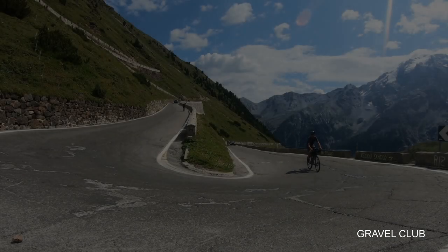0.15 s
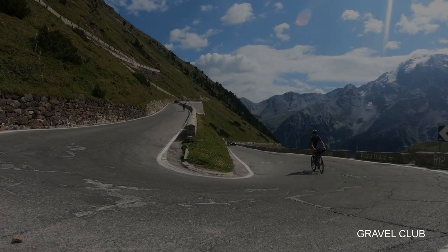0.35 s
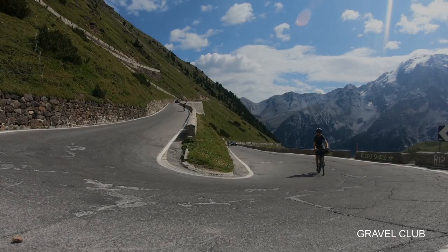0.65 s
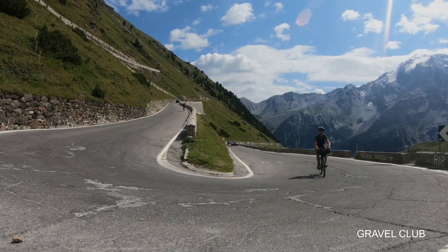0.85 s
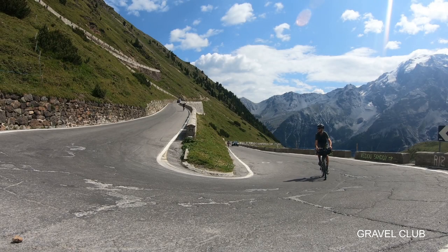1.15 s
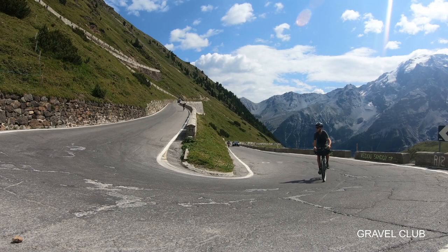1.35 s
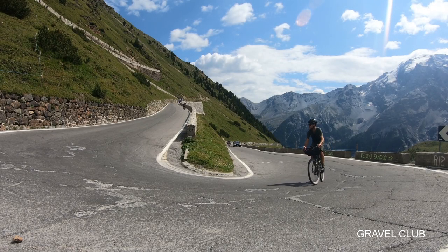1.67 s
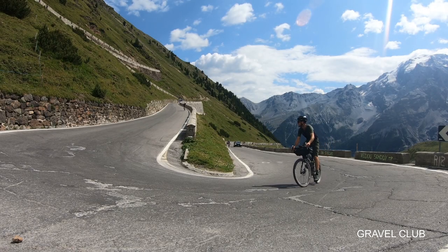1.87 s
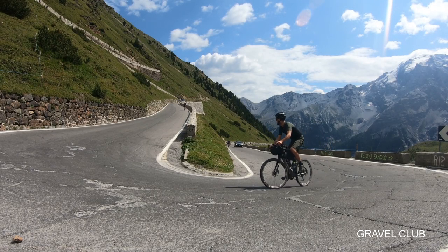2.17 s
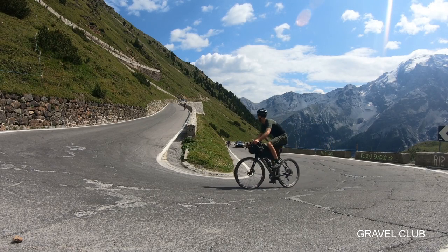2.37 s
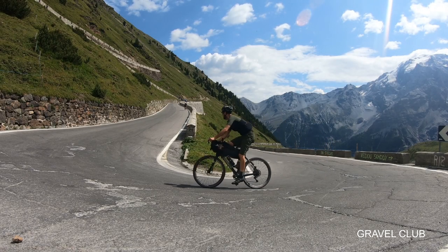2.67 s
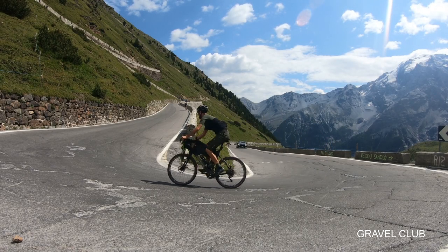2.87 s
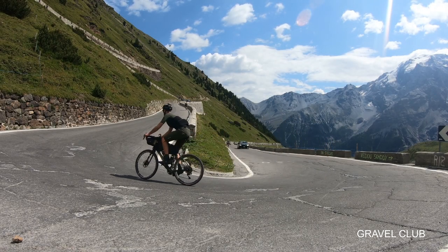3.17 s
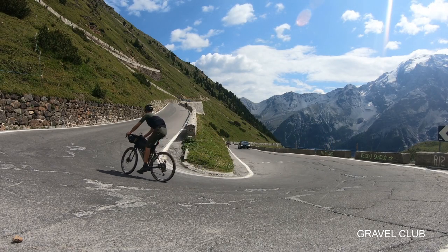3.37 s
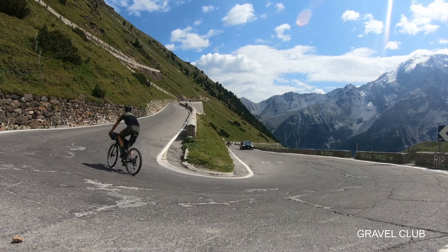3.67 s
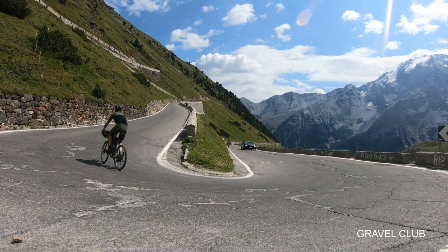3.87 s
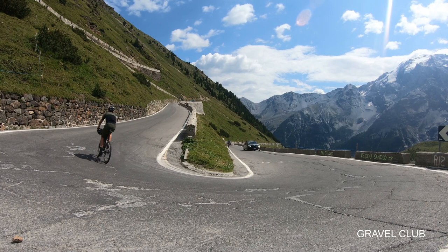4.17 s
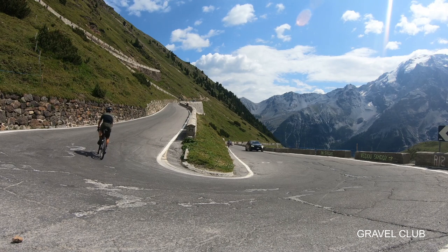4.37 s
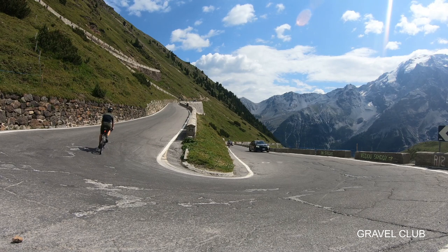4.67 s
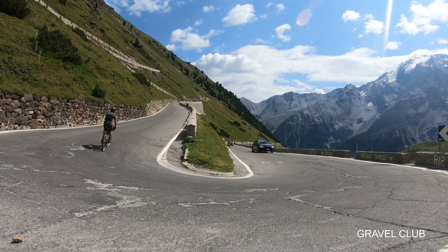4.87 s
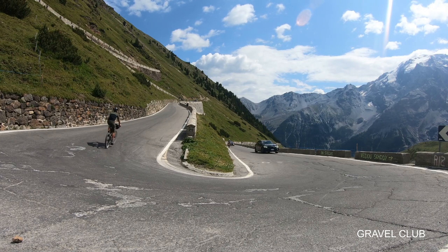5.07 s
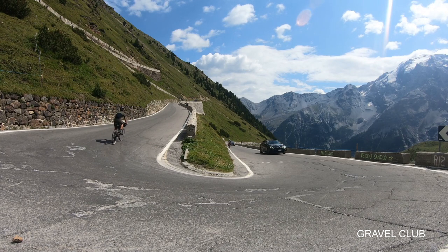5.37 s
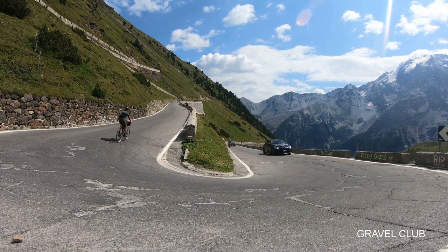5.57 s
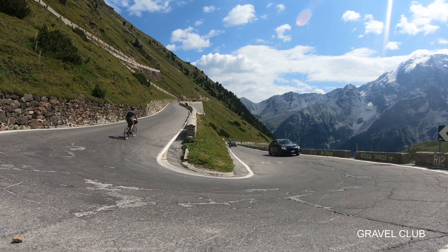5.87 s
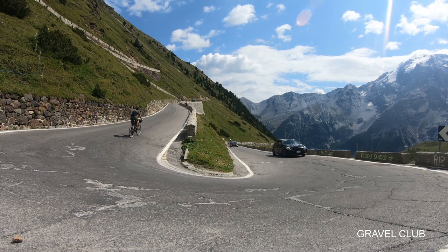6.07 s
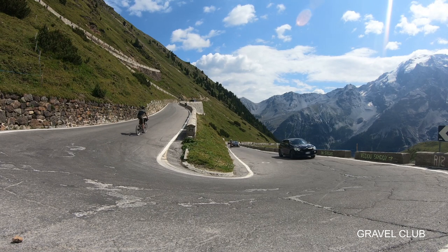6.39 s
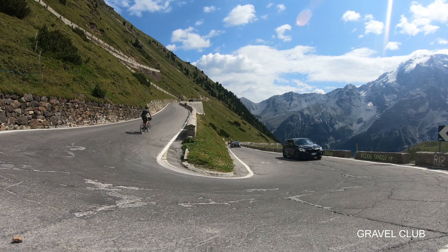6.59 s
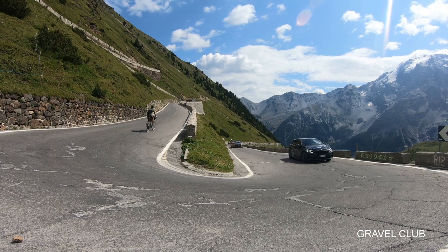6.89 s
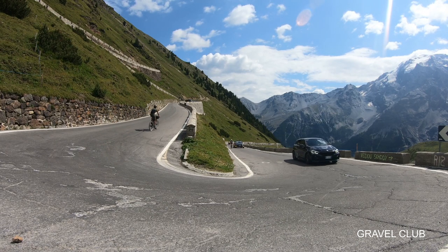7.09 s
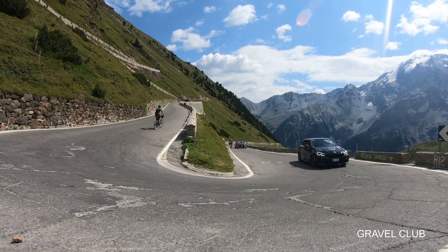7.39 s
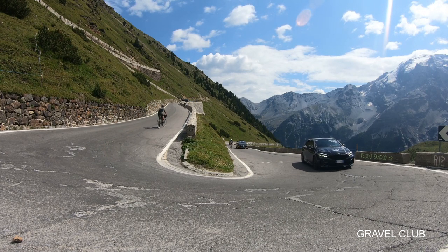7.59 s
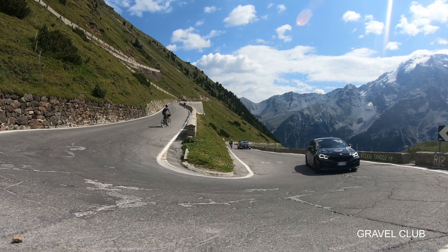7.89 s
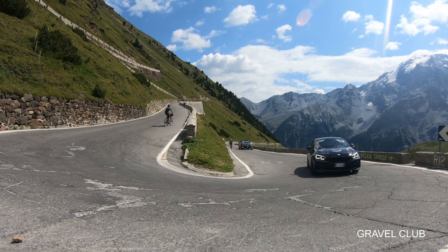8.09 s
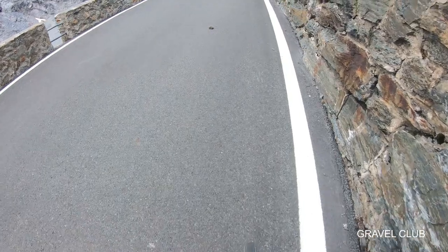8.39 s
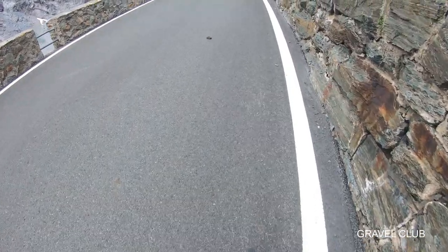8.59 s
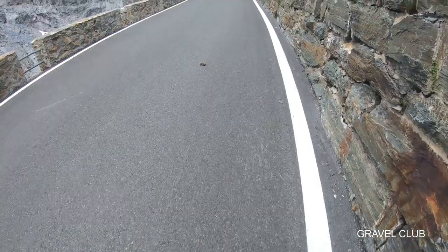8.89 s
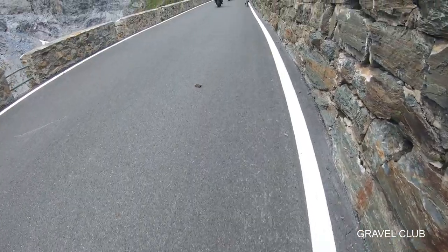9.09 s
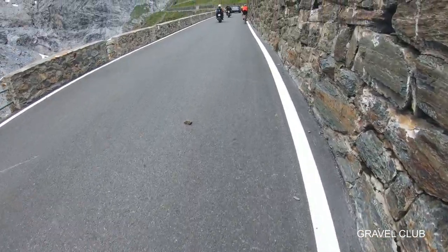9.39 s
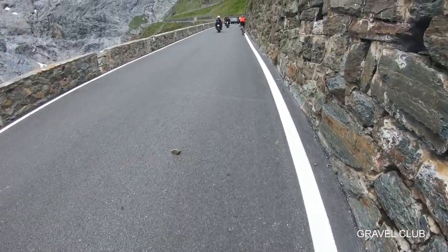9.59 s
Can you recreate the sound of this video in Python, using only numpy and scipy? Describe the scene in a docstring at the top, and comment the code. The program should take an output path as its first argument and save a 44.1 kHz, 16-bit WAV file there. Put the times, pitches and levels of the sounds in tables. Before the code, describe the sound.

Engines drone on a windy mountain road as a bicycle whirs past and a car approaches; then a motorcycle rumbles up close.

```python
"""A mountain pass, microphone at the roadside below a hairpin. Distant engines drone and beat against
each other over wind, rumble and tyre roar. One vehicle's hiss recedes, a bicycle ticks by, a faint
grasshopper rasps and a grit stone pops under an approaching car. After a short silence the microphone
is on board a twin-cylinder motorcycle pulling gently uphill, close to its exhaust, intake and gears."""
import sys
import numpy as np
from scipy import signal
from scipy.fft import rfft, irfft
from scipy.io import wavfile

SR = 44100
rng = np.random.default_rng(int(sys.argv[2]) if len(sys.argv) > 2 else 0)


def int16_out(signal):
    """Quantize to a 16-bit WAV file."""
    q = np.round(np.clip(np.atleast_2d(signal).T, -1, 1) * 32767)
    wavfile.write(sys.argv[1], SR, q.astype(np.int16))


N = 429534
T = np.arange(N) / SR
ROADSIDE_END_S, RIDE_START_S, RIDE_FULL_S = 8.243, 8.385, 8.47

# exhaust note from far across the slope: (multiple of the firing rate, level [dB])
FAR_NOTE = [(1, 0.5), (2, -18)]


def from_db(db):
    """Decibels to gain."""
    return 10 ** (np.asarray(db) / 20)


def rms_one(x):
    """Scale to rms 1."""
    return x / np.sqrt(np.mean(x ** 2) + 1e-20)


def in_time(rows):
    """Each column of a timed curve at every sample."""
    times, *columns = np.transpose(rows)
    return [np.interp(T, times, column) for column in columns]


def drift(rate_hz):
    """Smooth random wander of rms 1, mostly slower than rate_hz."""
    hz = np.arange(N // 2 + 1) * SR / N
    return rms_one(irfft(rfft(rng.standard_normal(N)) / (1 + (hz / rate_hz) ** 2), N))


def noise(colour):
    """Noise of rms 1 shaped by (frequency [Hz], level [dB]) points, falling steeply beyond them."""
    hz = np.maximum(np.arange(N // 2 + 1) * SR / N, 1)
    points_hz, db = np.transpose(colour)
    skirts = np.minimum(hz / points_hz[0], 1) ** 4 * np.minimum(points_hz[-1] / hz, 1) ** 8
    shape = from_db(np.interp(np.log(hz), np.log(points_hz), db))
    return rms_one(irfft(rfft(rng.standard_normal(N)) * skirts * shape, N))


def swell(db, from_s, rise_db_per_s, to_s=np.inf, fall_db_per_s=0):
    """Gain of a source that draws near, holds db between from_s and to_s, then recedes."""
    rise_db = rise_db_per_s * np.maximum(from_s - T, 0)
    fall_db = fall_db_per_s * np.maximum(T - to_s, 0)
    return from_db(db - rise_db - fall_db)


def revving(top_hz, from_s, rise_hz_per_s, to_s=np.inf, sag_hz_per_s=0):
    """Firing rate of an engine that picks up, holds and, if given an end, eases off."""
    return top_hz - rise_hz_per_s * np.maximum(from_s - T, 0) - sag_hz_per_s * np.maximum(T - to_s, 0)


def turning(hz):
    """Angle of something that turns hz times a second."""
    return 2 * np.pi * (np.cumsum(hz) / SR + rng.random())


def following(sound, speed):
    """Play a sound faster as its source turns faster; speed 1 keeps its pitch."""
    return np.interp(np.cumsum(speed) % N, np.arange(N), sound)


def harmonics(angle, note, flutter, flutter_hz):
    """Harmonics of an engine's rotation; uneven combustion makes each one flutter."""
    out = np.zeros(N)
    for multiple, db in note:
        wave = np.sin(round(multiple) * angle + rng.uniform(0, 2 * np.pi))
        out += np.sqrt(2) * from_db(db) * wave * (1 + flutter * drift(flutter_hz))
    return out


def distant_engine(hz, note, wander, flutter):
    """An engine heard across the slope, its pitch and strength unsteady."""
    angle = turning(hz * (1 + wander * drift(5.27)))
    return harmonics(angle, note, flutter, flutter_hz=6.6)


def lull(at_s=2.2, width_s=.42, depth_db=5):
    """Gain of the deepest bass, which sinks once and recovers."""
    return from_db(-depth_db * np.exp(-((T - at_s) / width_s) ** 2))


def bass_dips(edge_s=.024):
    """Gain of the bass, which drops away for a few brief moments."""
    # dips in level: (start [s], end [s], depth [dB])
    dips = [(-.1, 0.173, 12), (.173, .304, 1.5), (0.293, 0.572, 10.5), (6.307, 6.754, 3), (6.914, 7.1, 8.5),
            (7.935, 8.005, 7.5)]
    dip_db = sum(db * .5 * (np.tanh((T - start) / edge_s) - np.tanh((T - end) / edge_s))
                 for start, end, db in dips)
    return from_db(-dip_db)


def hairpin_car():
    """A car slows for the hairpin, booms once on the way and pulls again in the bend."""
    # its approach: (time [s], firing rate [Hz], level [dB])
    approach = [(0, 110, -37.5), (.7, 109, -31), (2.1, 106.3, -33), (2.4, 105.5, -26.5), (3, 103.7, -26.5),
                (3.7, 99.5, -30), (4.85, 96, -30.5), (5.4, 95.3, -37), (6, 91.5, -34.5), (6.5, 88, -36),
                (6.95, 86.5, -43), (7.25, 85.7, -29.5), (8.24, 83, -31)]
    # its exhaust: (multiple of the firing rate, level [dB])
    note = [(1, -0.5), (2, -28.5), (3, -34.5)]
    hz, db = in_time(approach)
    return from_db(db) * distant_engine(hz, note, wander=.0018, flutter=.16)


def leaving_engine():
    """A vehicle hums briefly as it pulls away from the microphone."""
    # its exhaust: (multiple of the firing rate, level [dB])
    note = [(2, -2), (3, -2)]
    hz = revving(top_hz=85.2, from_s=.92, rise_hz_per_s=4)
    gain = swell(db=-40, from_s=.79, rise_db_per_s=24, to_s=.85, fall_db_per_s=25.5)
    return gain * distant_engine(hz, note, wander=.0036, flutter=.24)


def far_engine():
    """A far engine revs up, holds and sags while it slowly draws nearer."""
    hz = revving(top_hz=137.35, from_s=1.7, rise_hz_per_s=4.8, to_s=3.3, sag_hz_per_s=2.2)
    gain = swell(db=-35.5, from_s=8.05, rise_db_per_s=1.16)
    return gain * distant_engine(hz, FAR_NOTE, wander=.0036, flutter=.23)


def heavy_engine(start_hz=46.54, idle_hz=38.17, settle_s=3.1, firings_per_throb=16.4, throb_at_s=2.29):
    """A heavy engine settles towards idle and recedes; its overtones throb, slowing with it."""
    # exhaust overtones: (multiple of the firing rate, level [dB])
    note = [(2, 1.5), (3, -16.5), (4, -23), (6, -28)]
    hz = idle_hz + (start_hz - idle_hz) * np.exp(-T / settle_s)
    firings = np.cumsum(hz) / SR
    throbs = (firings - np.interp(throb_at_s, T, firings)) / firings_per_throb
    throb = 1 + .38 * np.cos(2 * np.pi * throbs)
    angle = turning(hz * (1 + .0022 * drift(5.14)))
    fundamental = np.sqrt(2) * from_db(-4) * lull() * np.sin(angle)
    overtones = throb * harmonics(angle, note, flutter=.11, flutter_hz=9.9)
    gain = swell(db=-31.5, from_s=.68, rise_db_per_s=13, to_s=5.3, fall_db_per_s=2.5)
    return gain * (fundamental + overtones)


def climbing_motorbike():
    """A motorbike on the slope; its second harmonic swells as it pulls, its third as it eases off."""
    # its exhaust: (multiple of the firing rate, level [dB])
    note = [(1, 0.5), (5, -33.5)]
    hz = revving(top_hz=116.5, from_s=1.7, rise_hz_per_s=4, to_s=2.15, sag_hz_per_s=3.1)
    angle = turning(hz * (1 + .0027 * drift(4.5)))
    gain = swell(db=-33, from_s=.63, rise_db_per_s=18, to_s=2.3, fall_db_per_s=6)
    second = swell(db=-39, from_s=1.2, rise_db_per_s=23, to_s=1.98, fall_db_per_s=9.5)
    third = swell(db=-48, from_s=2, rise_db_per_s=5, to_s=3.5, fall_db_per_s=13)
    body = gain * harmonics(angle, note, flutter=.063, flutter_hz=13)
    return body + np.sqrt(2) * (second * np.sin(2 * angle) + third * np.sin(3 * angle))


def rumble():
    """Wind eases on the microphone over the blurred exhausts and drone of all the traffic."""
    # wind on the microphone: (frequency [Hz], level [dB])
    wind_colour = [(15, -21.5), (27, -12.5), (36, -2.5), (45, 1), (62, -1), (80, -10.5), (130, -37.5)]
    # blended exhausts: (frequency [Hz], level [dB])
    exhaust_colour = [(50, -26.5), (70, 3), (95, 11.5), (125, 3.5), (155, -6.5), (220, -36.5)]
    # traffic drone: (frequency [Hz], level [dB])
    drone_colour = [(120, -21.5), (165, 3), (200, 1), (260, 3), (300, -3.5), (380, -7), (480, -11.5),
                    (600, -19), (900, -39.5)]
    wind_gain = swell(db=-36, from_s=4.1, rise_db_per_s=-.5, to_s=5.2, fall_db_per_s=.4)
    wind = wind_gain * lull() * noise(wind_colour)
    exhausts = from_db(-33.5) * noise(exhaust_colour)
    leaving = swell(db=-38, from_s=.49, rise_db_per_s=7.5, to_s=2.1, fall_db_per_s=.83)
    coming = swell(db=-39, from_s=7.3, rise_db_per_s=2.5)
    return bass_dips() * (wind + exhausts) + np.hypot(leaving, coming) * noise(drone_colour)


def tyres():
    """The bright roar of a leaving vehicle gives way to the duller roll of the coming car."""
    # tyre roar, going away and coming near: (frequency [Hz], level [dB])
    leaving_roar = [(330, -21.5), (450, 0), (560, -1), (760, -6.5), (950, -4), (1400, -1.5), (1700, -5.5),
                    (1880, -12.5), (2500, -15), (3300, -36)]
    coming_roar = [(330, -16), (450, -4.5), (570, -6), (680, -7), (865, -8.5), (1180, -10), (1550, -15),
                   (2500, -21.5), (3300, -43)]
    # tyre hiss of the same two: (frequency [Hz], level [dB])
    leaving_hiss = [(1600, -6), (2300, -9.5), (2780, -5.5), (3100, -6.5), (3480, -7), (3950, -17.5),
                    (4650, -19), (4900, -20.5), (5200, -23), (5900, -27.5), (8500, -33.5), (10500, -40),
                    (14000, -58)]
    coming_hiss = [(1500, -20.5), (2200, -5.5), (2800, -1), (3900, -9.5), (5100, -17), (6000, -27.5),
                   (7200, -34), (10000, -41), (14000, -55.5)]
    coarse_asphalt = from_db(.69 * drift(35))
    roar = noise(leaving_roar) * swell(db=-45, from_s=.71, rise_db_per_s=11, to_s=2.28, fall_db_per_s=3)
    roar += noise(coming_roar) * swell(db=-46.5, from_s=7.94, rise_db_per_s=1)
    hiss = noise(leaving_hiss) * swell(db=-52.5, from_s=.43, rise_db_per_s=8, to_s=1.1, fall_db_per_s=10)
    hiss += noise(coming_hiss) * swell(db=-60, from_s=1.5, rise_db_per_s=11)
    return coarse_asphalt * (roar + hiss)


def howl():
    """A hollow midrange howl that leaves with the first vehicle."""
    # the hollow band: (frequency [Hz], level [dB])
    colour = [(440, -7.5), (540, -2), (620, -0.5), (700, -17)]
    return swell(db=-49.5, from_s=.16, rise_db_per_s=20, to_s=.66, fall_db_per_s=11) * noise(colour)


def ringing():
    """A thin metallic ringing that fades with the leaving vehicle."""
    # narrow resonances: (centre [Hz], half-width [Hz], level [dB])
    modes = [(2743, 120, 4), (3420, 110, 1), (4620, 110, -7), (5120, 90, -9.5), (5870, 200, -17.5)]
    ring = sum(from_db(db) * noise([(hz - width, -14), (hz, 0), (hz + width, -14)])
               for hz, width, db in modes)
    return swell(db=-57, from_s=.94, rise_db_per_s=16, to_s=1.48, fall_db_per_s=24) * rms_one(ring)


def high_ticks(cracks_per_s=10, decay_s=.002):
    """A few clear, tiny high ticks in a sparse, faint crackle."""
    # the clear ticks: (time [s], relative level [dB])
    ticks = [(.055, -56), (.15, -60), (3.5404, -65), (4.6473, -66), (5.044, -68), (5.9344, -66),
             (6.232, -65), (7.3028, -69), (7.7423, -67)]
    # colour of a tick: (frequency [Hz], level [dB])
    colour = [(4000, 0), (7000, -1), (10500, -0.5), (12000, -18), (14000, -26)]
    cracking = rng.random(N) < cracks_per_s / SR
    cracks = cracking * from_db(-79 + 2.5 * np.minimum(rng.exponential(1, N), 3))
    for at_s, db in ticks:
        cracks[int(at_s * SR)] += from_db(db - 5)
    envelope = signal.lfilter([1], [1, -np.exp(-1 / (decay_s * SR))], cracks + 1e-18)
    return envelope * noise(colour)


def grit(muffle_hz=3400):
    """A pinched stone springs free and rings for a few cycles, muffled by the rubber."""
    # stones popping: (time [s], relative level [dB], ring [Hz], time to fall 60 dB [s])
    pops = [(.156, -35, 2100, 0.0056), (.216, -32.5, 1960, 0.0061), (4.234, -29.5, 1150, 0.004),
            (6.938, -11, 880, 0.0047), (6.9384, -21.5, 2890, 0.0015), (6.947, -27, 1000, 0.0054)]
    out = np.zeros(N)
    for at_s, db, hz, t60 in pops:
        age = np.maximum(T - at_s, 0)
        release = 1 - np.exp(-age * hz * 1.2)
        decay = from_db(db + 6 - 60 * np.minimum(age / t60, 4))
        out += release * decay * np.sin(2 * np.pi * hz * age)
    return signal.sosfilt(signal.butter(6, muffle_hz, fs=SR, output="sos"), out)


def chain_snaps(attack_s=.0007):
    """Bicycle chain links strike in short bursts of noise, bright snaps and a duller clack."""
    # link strikes: (time [s], level [dB], decay [s], centre [Hz])
    strikes = [(.668, -35.5, .0065, 4200), (.677, -35, .011, 1200), (.678, -40, .009, 2700),
               (2.392, -53.5, .009, 4500), (5.258, -64, .009, 6000), (5.263, -58, .003, 4800)]
    # one strike: (multiple of the centre frequency, level [dB])
    colour = [(.15, -7), (.6, 0), (1, 1.5), (1.45, -11.5), (2.5, -22.5), (3.1, -32)]
    out = np.zeros(N)
    for at_s, db, decay_s, hz in strikes:
        age = np.maximum(T - at_s, 0)
        attack = 1 - np.exp(-np.minimum(age / attack_s, 20))
        decay = np.exp(-np.minimum(age / decay_s, 20))
        out += from_db(db) * attack * decay * noise([(ratio * hz, level) for ratio, level in colour])
    return out


def sprockets(snaps, t60_s=.067):
    """The steel sprockets ring briefly at each snap, damped by the chain."""
    # their modes: (frequency [Hz], gain [dB])
    modes = [(1303, 5.5), (2051, 5), (2358, 2), (2659, 5.5), (3800, -4), (4813, 3), (9507, 4), (10540, 1)]
    radius = from_db(-60 / (t60_s * SR))
    feed = (1 - radius ** 2) / 2
    out = np.zeros(N)
    for hz, db in modes:
        feedback = [1, -2 * radius * np.cos(2 * np.pi * hz / SR), radius ** 2]
        out += from_db(db) * signal.lfilter([feed, 0, -feed], feedback, snaps + 1e-18)
    return out


def bicycle(push_s=.26):
    """A bicycle passes the microphone, its whirr swelling with two harder pedal strokes."""
    # whirr of tyres and chain: (frequency [Hz], level [dB])
    colour = [(1200, -13), (1450, -5.5), (1620, -2.5), (1780, -6), (2000, -20.5)]
    # pedal strokes: (time [s], gain [dB])
    pushes = [(4.15, 8.8), (4.68, 9.9)]
    push_db = sum(db * np.exp(-((T - at_s) / push_s) ** 2) for at_s, db in pushes)
    gain = swell(db=-64.5, from_s=1.1, rise_db_per_s=2, to_s=3.8, fall_db_per_s=2.5)
    snaps = chain_snaps()
    return gain * from_db(push_db) * noise(colour) + snaps + sprockets(snaps)


def passing_engines(fade_db_per_s=23):
    """Each engine comes out from behind the slope, gains or loses speed evenly and is hidden again."""
    # spells in the open: (start [s], end [s], first firing rate [Hz], last rate [Hz], level [dB])
    passers = [(1.899, 3.2, 165.5, 164.7, -47.5), (3.901, 4.4, 164.6, 162.2, -43),
               (4.5, 6.2, 118.7, 125.2, -37.5), (5.5, 7.204, 141.2, 138.9, -42.5),
               (6.55, 8.2, 157.6, 151.2, -40.5), (7.1, 8.2, 69.8, 63, -38)]
    out = np.zeros(N)
    for from_s, to_s, from_hz, to_hz, db in passers:
        hz = from_hz + (to_hz - from_hz) * (T - from_s) / (to_s - from_s)
        gain = swell(db, from_s, fade_db_per_s, to_s, fade_db_per_s)
        out += gain * distant_engine(hz, FAR_NOTE, wander=.0025, flutter=.22)
    return out


def grasshopper(strokes_per_s=5.59, slowing_per_s2=.08, stroke_at_s=6.955):
    """Leg strokes in loose, slowly slackening time, each a soft high rasp of its own strength."""
    # the rasp: (frequency [Hz], level [dB])
    colour = [(4500, -14), (5500, -0.5), (7200, 1.5), (8500, -2), (10500, -8), (12000, -22), (14000, -32.5)]
    since = T - stroke_at_s
    beat = strokes_per_s * since - .5 * slowing_per_s2 * since ** 2 + .04 * drift(5)
    stroke = (.5 + .5 * np.cos(2 * np.pi * beat)) ** 3
    strength = from_db(1.9 * drift(5) + 1.5 * drift(150))
    return swell(db=-81.5, from_s=5, rise_db_per_s=3.5) * strength * stroke * noise(colour)


def stop_click(db=-21, decay_s=.00046):
    """A short, dry click as the roadside falls silent."""
    age = np.maximum(T - ROADSIDE_END_S, 0)
    return from_db(db) * (T >= ROADSIDE_END_S) * np.exp(-age / decay_s)


def twin_engine():
    """The motorcycle's twin, close up: intake and clatter throb with the firings; all rise in pitch."""
    # the gentle pull: (time [s], engine cycle rate [Hz])
    revs = [(8.42, 25.1), (8.87, 25.65), (9.274, 26.6), (9.72, 27.15)]
    # relative levels under throttle: (time [s], exhaust [dB], intake [dB], clatter [dB])
    throttle = [(8.47, -12, -34.5, -43), (8.532, -14.5, -35, -45), (8.884, -16, -40, -47.5),
                (9.308, -17, -37.5, -47.5), (9.72, -18, -42.5, -49.5)]
    # exhaust note and its uneven upper growl: (multiple of the cycle rate, level [dB])
    exhaust_note = [(1, -27), (2, -10), (3, -14), (4, -14.5), (5, 3), (6, -4), (7, -7.5), (8, -10.5)]
    growl_note = [(9, -21.5), (10, -18.5), (11, -19.5), (12, -23), (13, -25), (14, -29.5), (15, -29.5),
                  (16, -36)]
    # intake roar and engine clatter: (frequency [Hz], level [dB])
    intake_colour = [(300, -12), (380, -3), (460, -3.5), (570, 1.5), (715, -6.5), (820, -4), (920, -4),
                     (1000, -6), (1130, -16.5), (1500, -30)]
    clatter_colour = [(1050, -12), (1200, -2.5), (1400, -1), (1650, -4.5), (1900, -3), (2120, -5),
                      (2500, -9), (3200, -8), (3600, -12), (4050, -9.5), (4900, -17), (6000, -23.5),
                      (10500, -36.5), (14000, -51)]
    # engine whine and gear whine: (multiple of the cycle rate, level [dB])
    whine_note = [(19, -11), (20, -10), (22, -8.5), (29, -14.5), (30, -12.5), (31, -11.5), (33, -13),
                  (34, -10), (35, -1.5), (36, -7), (37, -9.5), (38, -11.5)]
    gear_note = [(53, -4), (54, 1.5), (56, -5.5), (79, 0), (80, -3), (82, 0), (84, -7.5)]
    # one harmonic sings out as it crosses a resonance: (multiple of the cycle rate, level [dB])
    singing_note = [(34, 0)]
    cycle_hz, = in_time(revs)
    exhaust_db, intake_db, clatter_db = in_time(throttle)
    speed = cycle_hz / np.mean(cycle_hz[T > RIDE_START_S])
    angle = turning(cycle_hz * (1 + .0042 * drift(20.6)))
    exhaust = from_db(exhaust_db - 4.5) * harmonics(angle, exhaust_note, flutter=.07, flutter_hz=13)
    growl = from_db(exhaust_db - 3.5) * harmonics(angle, growl_note, flutter=.36, flutter_hz=12)
    gulps = from_db(2 * np.cos(2 * angle) + .62 * np.cos(angle))   # two unequal gulps a cycle
    intake = from_db(intake_db - 2.5) * rms_one(following(noise(intake_colour), speed) * gulps)
    whine = from_db(intake_db - 11) * harmonics(angle, whine_note, flutter=.78, flutter_hz=17)
    throb = from_db(np.cos(2 * angle))
    clatter = from_db(clatter_db + 2) * rms_one(following(noise(clatter_colour), speed) * throb)
    gear_gain = swell(db=-60, from_s=9.25, rise_db_per_s=11.5, to_s=9.35, fall_db_per_s=9.5)
    gears = gear_gain * harmonics(angle, gear_note, flutter=.72, flutter_hz=18)
    singing_gain = swell(db=-45, from_s=8.6, rise_db_per_s=89.5, to_s=8.74, fall_db_per_s=59.5)
    singing = singing_gain * harmonics(angle, singing_note, flutter=.44, flutter_hz=22)
    return exhaust + growl + intake + whine + clatter + gears + singing


def hums():
    """Hums at nearly steady pitches during the ride, each swelling towards its own moment."""
    # the hums: (pitch [Hz], top level [dB], time of the top [s], fade either side [dB/s])
    tones = [(61, -34.5, 8.75, 8), (102.4, -33.5, 9.3, 10.5), (114.2, -23, 9.3, 2), (210, -29, 8.6, 3),
             (315, -34, 8.53, 17), (528, -45.5, 9.22, 15), (596, -46, 9.4, 18.5), (840, -51, 9.17, 45.5),
             (2880, -62.5, 13, 9)]
    out = np.zeros(N)
    for hz, db, top_s, fade in tones:
        gain = from_db(db - fade * np.abs(T - top_s) + 1.1 * drift(3.2))
        angle = turning(hz * (1 + .0036 * drift(9)))
        out += np.sqrt(2) * gain * np.sin(angle)
    return out


def slipstream():
    """Air rushes past the on-board microphone."""
    # the rush of air: (frequency [Hz], level [dB])
    colour = [(20, -24), (40, -5), (56, 6), (80, 0), (120, -1), (200, -3.5), (320, -15.5), (420, -20.5),
              (700, -41.5)]
    return from_db(-30.5) * noise(colour)


def rattles(attack_s=.0045, t60_s=.042):
    """A loose part on the motorcycle knocks over bumps and rings briefly."""
    # knocks: (time [s], level [dB], ring [Hz])
    knocks = [(8.522, -28, 946), (8.546, -22, 905), (8.581, -28, 864), (8.64, -21.5, 873),
              (8.818, -24, 904), (9.241, -27, 838), (9.331, -25, 936)]
    out = np.zeros(N)
    for at_s, db, hz in knocks:
        age = np.maximum(T - at_s, 0)
        attack = 1 - np.exp(-age / attack_s)
        decay = from_db(db - 60 * np.minimum(age / t60_s, 4))
        out += attack * decay * np.sin(2 * np.pi * hz * age)
    return out * (.96 + .4 * drift(110))   # the part buzzes against its seat


def scene(fade_out_s=.004):
    """Two microphone positions in mono: the roadside stops dead, then the ride fades in."""
    car, leaving = hairpin_car(), leaving_engine()
    engines = bass_dips() * (car + far_engine() + heavy_engine() + climbing_motorbike())
    traffic = engines + leaving + passing_engines() + rumble() + tyres() + howl() + ringing()
    roadside = traffic + grasshopper() + bicycle() + grit() + high_ticks()
    ride = twin_engine() + hums() + rattles() + slipstream()
    stop = np.clip((ROADSIDE_END_S - T) / fade_out_s + 1, 0, 1)
    fade_in = np.clip((T - RIDE_START_S) / (RIDE_FULL_S - RIDE_START_S), 0, 1) ** 2
    fade_out = np.minimum((T[-1] - T) / fade_out_s, 1)
    return (roadside * stop + stop_click() + ride * fade_in * fade_out)[None]


def record(dry):
    """A steep low-pass takes off the highest treble."""
    cutoff_hz = 14900
    return signal.sosfilt(signal.cheby2(12, 70, cutoff_hz, fs=SR, output="sos"), dry)


dry = scene()
out = record(dry)
int16_out(out)
```